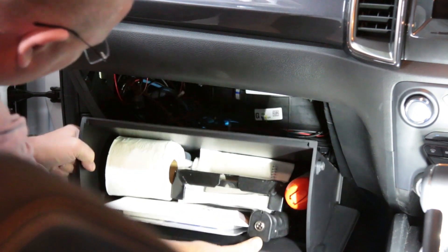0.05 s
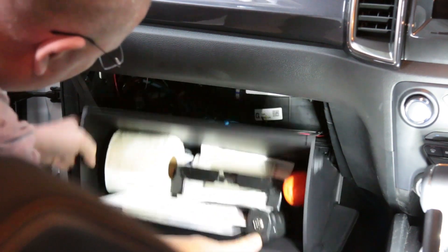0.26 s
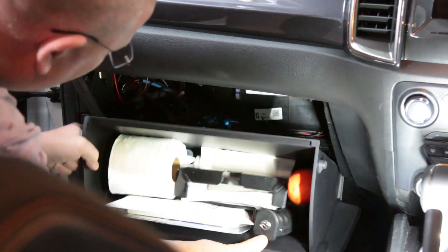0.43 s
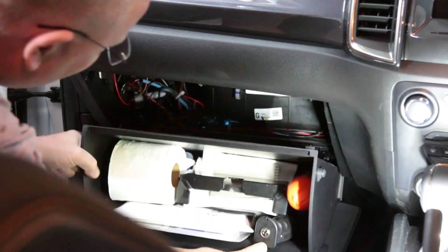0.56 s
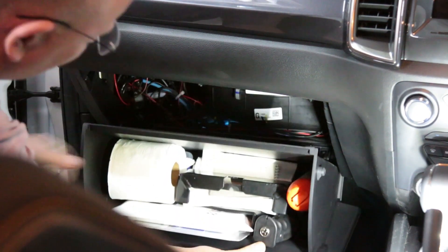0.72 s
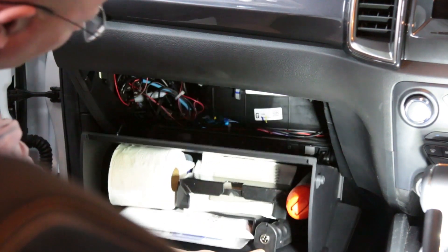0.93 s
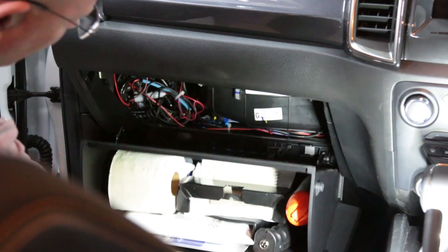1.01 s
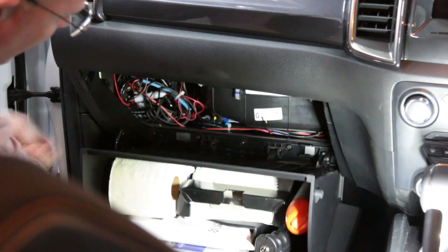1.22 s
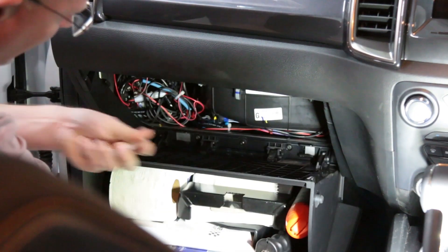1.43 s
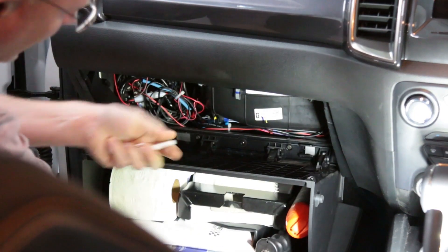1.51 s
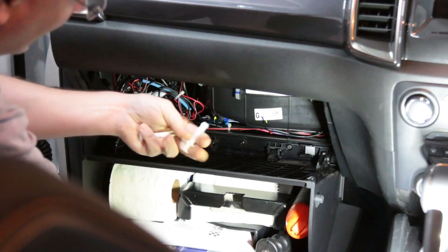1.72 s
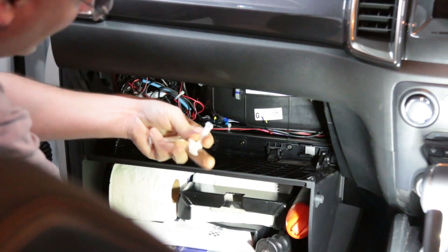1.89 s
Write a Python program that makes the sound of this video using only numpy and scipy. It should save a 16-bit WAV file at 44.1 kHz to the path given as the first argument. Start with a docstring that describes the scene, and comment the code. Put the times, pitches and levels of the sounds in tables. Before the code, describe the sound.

Plastic clacks and knocks as a car's glove box is lowered, followed by faint hollow ticks.

```python
"""Inside a parked car, a loaded plastic glove box is worked loose from the dashboard and lowered.
The bin scuffs and thuds, its panels ring, its edges clack past their stops and its contents rattle.
Rubbed plastic squeaks faintly; then comes a run of soft, hollow ticks.
The small padded cabin answers the knocks and clacks briefly, over a faint hum and hiss."""
import sys
import numpy as np
from scipy import signal
from scipy.fft import rfft, irfft, next_fast_len
from scipy.io import wavfile
from scipy.ndimage import map_coordinates

SR = 44100
rng = np.random.default_rng(int(sys.argv[2]) if len(sys.argv) > 2 else 0)


def transcribe(u):
    """Save the signal u as a 16-bit wav file named by the first command-line argument.

    u: samples, shape (n,) or (channels, n), limited to [-1, 1]; the rate is SR.
    q: integer samples, one column per channel.
    """
    v = np.clip(np.atleast_2d(u).T, -1, 1)
    q = np.round(v * 32767).astype(np.int16)
    wavfile.write(sys.argv[1], SR, q)


N = 85995
T = np.arange(SR // 2) / SR  # the half second that one hit lasts

# The colour of the plastic's dense upper modes. Each row: frequency in Hz, relative level in dB.
PLASTIC_COLOUR = [(200, 11), (600, 7.5), (950, 4.5), (1150, -5.5), (1900, 5.5), (2500, 0), (2950, -0.5),
                  (3500, -8), (4700, -9), (5800, -16.5), (7000, -19.5), (11000, -25.5), (15500, -41)]
# The stereo image, wider in the treble. Each row: frequency in Hz, left-right likeness from 0 to 1.
STEREO_LIKENESS = [(300, 0.95), (1000, 0.97), (2000, 0.84), (4000, 0.21), (10000, 0.095)]


def amp(db):
    """Decibels to gain."""
    return 10 ** (np.asarray(db) / 20)


def unit(x):
    """Scale to rms 1."""
    return x / np.sqrt(np.mean(x ** 2) + 1e-20)


def along(points, hz):
    """Read (Hz, value) points on a log axis."""
    freqs, values = np.transpose(points)
    return np.interp(np.log(hz + 1), np.log(freqs + 1), values)


def filtered(x, response):
    """Multiply the spectrum by a function of frequency."""
    n = x.shape[-1]
    size = next_fast_len(2 * n)
    return irfft(rfft(x, size) * response(np.fft.rfftfreq(size, 1 / SR)), size)[..., :n]


def noise(n, colour_db, likeness=STEREO_LIKENESS):
    """Stereo noise of rms 1 with a colour and a left-right likeness."""
    def mid_side_gains(hz):
        angle = np.arccos(np.clip(along(likeness, hz), 0, 1)) / 2
        return amp(colour_db(hz)) * [np.cos(angle), np.sin(angle)]
    mid, side = filtered(rng.standard_normal((2, n)), mid_side_gains)
    return unit(np.array([mid + side, mid - side]))


def wobble(rate):
    """A smooth random curve, rate knots a second."""
    knots = rng.standard_normal(int(N * rate / SR) + 4)
    return map_coordinates(knots, [np.arange(N) * rate / SR])


def fade(t, t60):
    """Exponential decay, 60 dB down after t60 seconds."""
    return np.exp(-np.log(1000) * t / t60)


def damped(x, decays):
    """Let each frequency die at its own speed."""
    hz, t, spectrum = signal.stft(x, SR, nperseg=128)
    spectrum = spectrum * fade(t, along(decays, hz)[:, None])
    return signal.istft(spectrum, SR, nperseg=128)[1][:, :len(T)]


def ring(modes, scatter_db=1):
    """Damped modes, struck a little differently each time."""
    return sum(amp(db + scatter_db * rng.standard_normal()) * fade(T, t60) * np.sin(2 * np.pi * hz * T)
               for hz, db, t60 in modes)


def bell_curve(hz, centre_hz, octaves):
    """A peak of height 1 on a log frequency axis."""
    return np.exp(-(np.log2(hz / centre_hz) / octaves) ** 2)


def favoured(modes, spot_hz, boost_db=8):
    """Boost the modes nearest the struck spot's resonance."""
    return [(hz, db + boost_db * bell_curve(hz, spot_hz, octaves=.16), t60) for hz, db, t60 in modes]


def add(out, start_s, x):
    """Mix x in from start_s."""
    i = round(start_s * SR)
    out[:, i:i + len(T)] += x[..., :N - i]


def pan(db):
    """Stereo gains: positive leans left, negative right."""
    return amp([[db], [-db]])


def background():
    """A bed of faint hiss and a low hum that wanders in pitch."""
    # The hiss's colour. Each row: frequency in Hz, relative level in dB.
    colour = [(15, -53), (25, -15.5), (91, -4), (119, -12), (193, -14), (227, -19.5), (331, -12),
              (389, -22.5), (469, -17.5), (1380, -22), (2300, -27), (3440, -27), (15500, -35.5)]
    # Its stereo image. Each row: frequency in Hz, left-right likeness from 0 to 1.
    likeness = [(100, 0.9), (500, 0.52), (1500, 0.2), (4000, 0.017), (12000, 0.045)]
    hum_hz = 97.7 + 5.78 * wobble(25)
    hum = unit(np.sin(2 * np.pi * np.cumsum(hum_hz) / SR))
    hiss = noise(N, lambda hz: along(colour, hz), likeness)
    return amp(-61.5) * hiss + amp(-67.5) * hum


def rubbing():
    """The bin scuffs softly on its way down, and the rubbed plastic gives faint, wavering squeaks."""
    # The swells of the scuff. Each row: time in seconds, level in dB.
    swells = [(.17, -65), (.3, -51), (.46, -64), (.62, -54), (.8, -62), (1.1, -66.5), (1.31, -88),
              (1.37, -60), (1.45, -92)]
    # Its colour. Each row: frequency in Hz, relative level in dB.
    colour = [(40, 10.5), (170, -2.5), (400, -4.5), (1000, -5), (2000, -8.5), (5000, -21.5), (12000, -31)]
    # Each row: a squeak's centre in seconds, level in dB, pitch in Hz, length in seconds, rise in Hz/s.
    squeaks = [(1.062, -71, 3400, 0.022, 0), (1.352, -56.5, 1370, 0.0068, 4002),
               (1.388, -74, 1400, 0.043, 4999.5), (1.393, -72.5, 2190, 0.047, 1)]
    t = np.arange(N) / SR
    out = amp(np.interp(t, *np.transpose(swells))) * noise(N, lambda hz: along(colour, hz))
    for centre, db, pitch_hz, length, rise in squeaks:
        glide_hz = pitch_hz + rise * (t - centre) + 25 * wobble(300)
        tone = unit(np.sin(2 * np.pi * np.cumsum(glide_hz) / SR))
        out += amp(db) * tone * np.exp(-(2 * (t - centre) / length) ** 2)
    return out


def bin_knocks(thud_attack_s=.0014, panel_attack_s=.0031):
    """The heavy bin thuds against the dashboard; which panel mode speaks depends on where it is hit."""
    # Each row: a knock's start in seconds, thud in dB, panel ring in dB, struck spot's resonance in Hz.
    hits = [(0.191, -44.5, -42, 580), (0.199, -23, -34.5, 303), (0.217, -19, -22, 292),
            (0.2247, -25.5, -23, 560), (.231, -19.5, -24, 305), (0.2356, -53, -33, 597),
            (0.267, -25, -60, 303), (.298, -38, -31, 365), (.344, -40, -37, 370),
            (0.387, -44.5, -39.5, 605), (0.497, -27.5, -34, 315), (.517, -27.5, -28, 405),
            (.524, -46, -28, 970), (.533, -19, -35.5, 406), (.538, -51, -31.5, 950),
            (.557, -28.5, -33.5, 383), (.566, -30, -33.5, 606), (0.586, -40, -43, 398),
            (0.641, -52, -46, 303), (0.669, -45, -39, 447), (.684, -33.5, -37, 303),
            (0.773, -47.5, -65, 309), (1.091, -55, -64.5, 303), (1.352, -52.5, -58.5, 303)]
    # The low modes of the whole bin. Each row: frequency in Hz, level in dB, t60 in seconds.
    bin_modes = [(58.8, -22, 0.6), (95, -13, 0.079), (148.6, -1.5, 0.057), (165.5, -9, 0.079)]
    # The modes of its thin panels. Each row: frequency in Hz, level in dB, t60 in seconds.
    panel_modes = [(305, -5, .11), (388, -5, .08), (435, -9, .05), (552, -4, .06), (605, -8, .06),
                   (729, -14, .05), (895, -14, .05), (995, -12, .06)]
    out = np.zeros((2, N))
    for start, thud_db, panel_db, spot_hz in hits:
        thud = ring(bin_modes) * (1 - np.exp(-T / thud_attack_s))
        panel = ring(favoured(panel_modes, spot_hz)) * (1 - np.exp(-T / panel_attack_s))
        add(out, start, amp(thud_db) * thud + amp(panel_db) * panel)
    return out * pan(-.05)


def plastic_clacks(contact_s=.00015):
    """Hard contacts: a short crack, a wash of dense plastic modes and the ring of the stiff rim."""
    # Each row: a clack's start in seconds, level in dB, brightness in dB per octave,
    # struck spot's resonance in Hz, crack in dB relative to the wash.
    hits = [(0.2176, -27, 3, 5200, -8), (.2215, -25, -9, 1950, -8.5), (.232, -25.5, -1, 920, -24),
            (.258, -40, 0.5, 2180, -11), (0.296, -38, -7.5, 1640, -11), (.306, -46, -7, 1310, -3),
            (0.377, -42, -2.5, 2470, -13), (.389, -40.5, -15, 646, -9), (0.496, -47.5, 1.5, 2140, -15),
            (0.513, -33.5, -3.5, 2920, -15), (0.5162, -30.5, 0.5, 4500, -3), (0.528, -34.5, 0.5, 960, -11),
            (.539, -31.5, -6, 1030, -13), (.564, -35, -2.5, 1840, -23), (.602, -40, -3, 1610, -9),
            (.615, -61, -6, 1890, -9), (0.645, -56, 5.5, 2600, -18), (0.6675, -34.5, -1, 3500, 1.5),
            (.742, -49, -21, 1030, -15)]
    # The rim's modes. Each row: frequency in Hz, relative level in dB, t60 in seconds.
    rim_modes = [(1461, -8, 0.14), (1603, -7.5, 0.076), (1856, -8.5, 0.1), (2143, -6.5, 0.065),
                 (2424, -15.5, 0.048)]
    # The decay of the wash. Each row: frequency in Hz, t60 in seconds.
    decays = [(500, 0.061), (2000, 0.068), (5000, 0.094), (12000, 0.15)]
    out = np.zeros((2, N))
    for start, db, brightness, spot_hz, crack_db in hits:
        tilt_db = lambda hz: brightness * np.log2(np.maximum(hz, 1000) / 2000)
        spot_db = lambda hz: 5 * bell_curve(hz + 1, spot_hz, octaves=.48)
        grain = noise(len(T), lambda hz: along(PLASTIC_COLOUR, hz) + tilt_db(hz) + spot_db(hz))
        wash = damped(grain, decays)
        crack = amp(crack_db) * grain * fade(T, t60=.008)
        rim = sum(amp(mode_db) * fade(T, t60) * np.sin(2 * np.pi * (hz * T + rng.random()))
                  for hz, mode_db, t60 in favoured(rim_modes, spot_hz))
        onset = 1 - np.exp(-T * amp(crack_db) / contact_s)  # softer contacts crack less and rise slower
        add(out, start, amp(db) * (wash + crack + amp(-8) * rim) * onset)
    return out * pan(-1.2)


def cabin(x):
    """The short, dull answer of the car's padded interior."""
    # The tail's colour. Each row: frequency in Hz, gain in dB.
    colour = [(50, -5), (150, -6), (240, -9), (400, -2), (1000, 0.4), (3000, -4), (10000, -8)]
    # Its decay. Each row: frequency in Hz, t60 in seconds.
    decays = [(60, 0.62), (250, 0.38), (1000, 0.21), (8000, 0.16)]
    white = noise(len(T), np.zeros_like)
    tail = damped(white, decays) * (1 - np.exp(-T / .0012))
    tail = filtered(tail / np.linalg.norm(tail[0]), lambda hz: amp(along(colour, hz)))
    return signal.fftconvolve(x, tail, axes=1)[:, :N]


def stop_bumps():
    """The bin lands on its stops: each time one low swing of pressure that hardly rings."""
    # Each row: a landing's centre in seconds, level in dB, pitch in Hz.
    landings = [(0.2319, -15.5, 122), (0.5325, -32.5, 163)]
    t = np.arange(N) / SR
    out = np.zeros(N)
    for centre, db, hz in landings:
        offset_squared = (np.pi * hz * (t - centre)) ** 2
        out += amp(db) * (1 - 2 * offset_squared) * np.exp(-offset_squared)
    return out * pan(-.05)


def hollow_ticks(attack_s=.0003, roughness_rad=.3):
    """Small rounded ticks: one slightly rough, hollow resonance and a faint snap."""
    # Each row: a tick's start in seconds, level in dB, pitch in Hz.
    ticks = [(1.4611, -47.5, 610), (1.5332, -43, 633), (1.6007, -43.5, 620), (1.667, -45.5, 615),
             (1.7513, -45.5, 645), (1.798, -56, 744), (1.8282, -48, 608)]
    out = np.zeros((2, N))
    for start, db, pitch_hz in ticks:
        snap = noise(len(T), lambda hz: along(PLASTIC_COLOUR, hz)) * fade(T, t60=.014)
        jitter = roughness_rad * wobble(pitch_hz)[:len(T)]
        envelope = fade(T, t60=.036) * (1 - np.exp(-T / attack_s))
        hollow = np.sin(2 * np.pi * pitch_hz * T + jitter) * envelope
        add(out, start, amp(db) * (hollow + amp(-17) * snap))
    return out


def scene(low_cut_hz=62, left_lead_s=.00003):
    """The glove box in the cabin: its hits radiate little deep bass and reach the left a touch earlier."""
    contacts = plastic_clacks() + bin_knocks()
    box = contacts + stop_bumps() + amp(-10) * cabin(contacts)
    box = signal.sosfilt(signal.butter(2, low_cut_hz, "high", fs=SR, output="sos"), box)
    box = filtered(box, lambda hz: np.exp(1j * np.pi * hz * left_lead_s * np.array([[1], [-1]])))
    return box + hollow_ticks() + rubbing() + background()


def record(dry):
    """A sheer cut takes off the very top of the treble."""
    return filtered(dry, lambda hz: hz < 15800)


dry = scene()
out = record(dry)
transcribe(out)
```